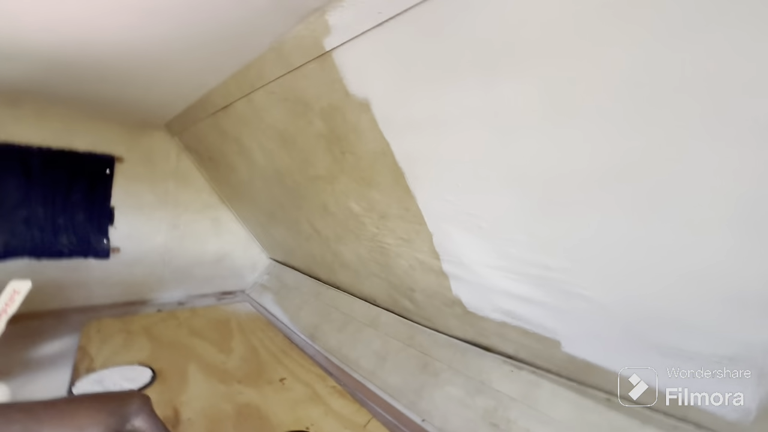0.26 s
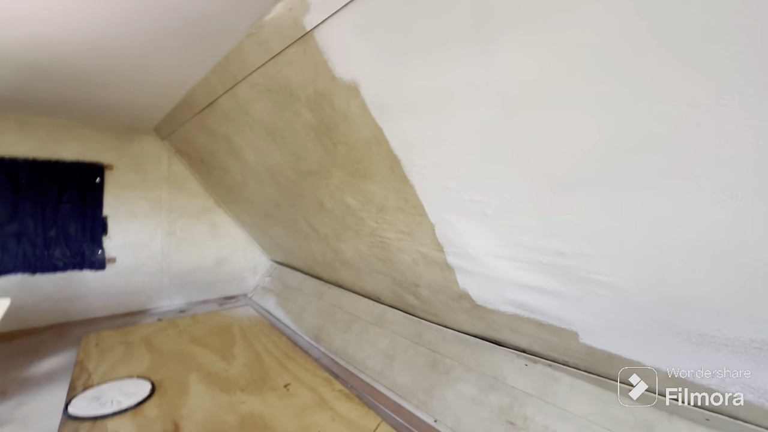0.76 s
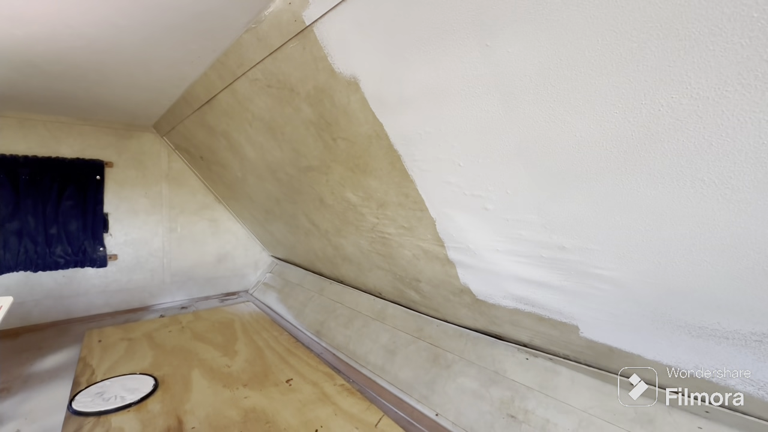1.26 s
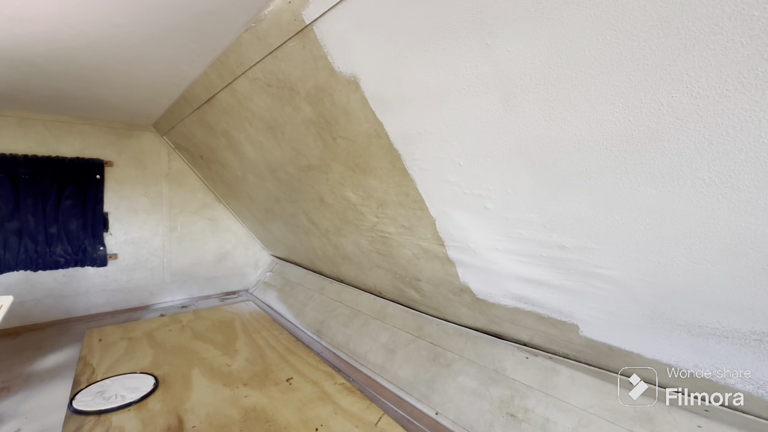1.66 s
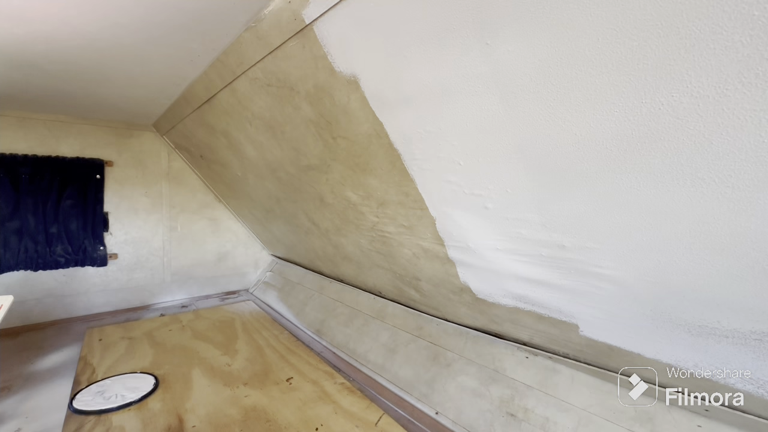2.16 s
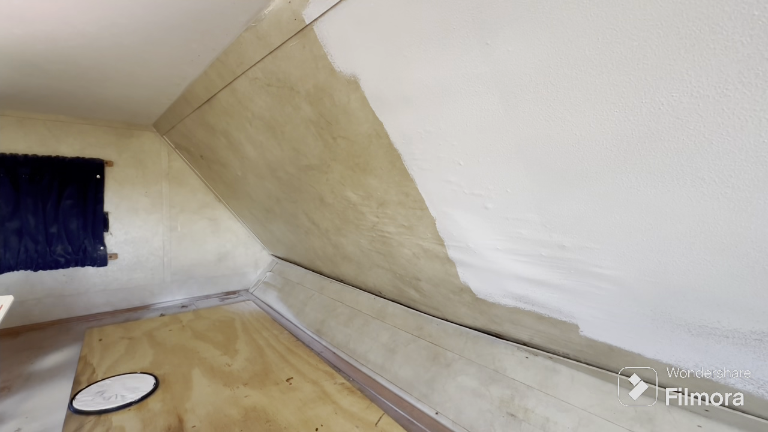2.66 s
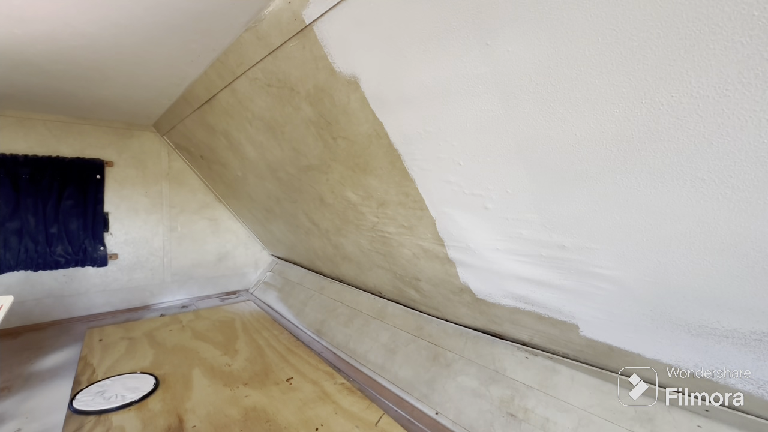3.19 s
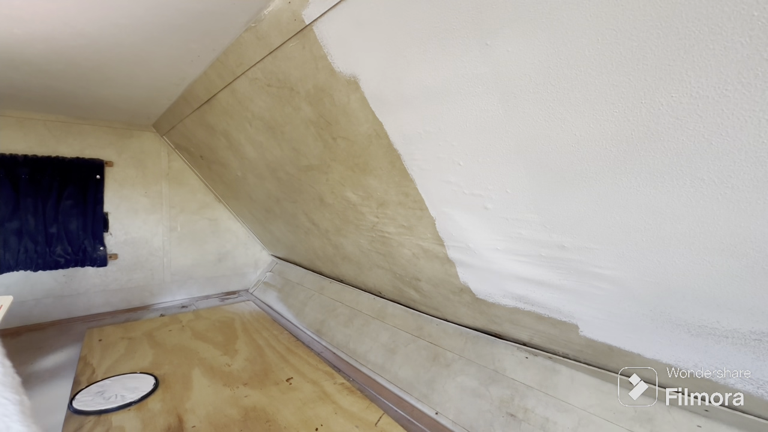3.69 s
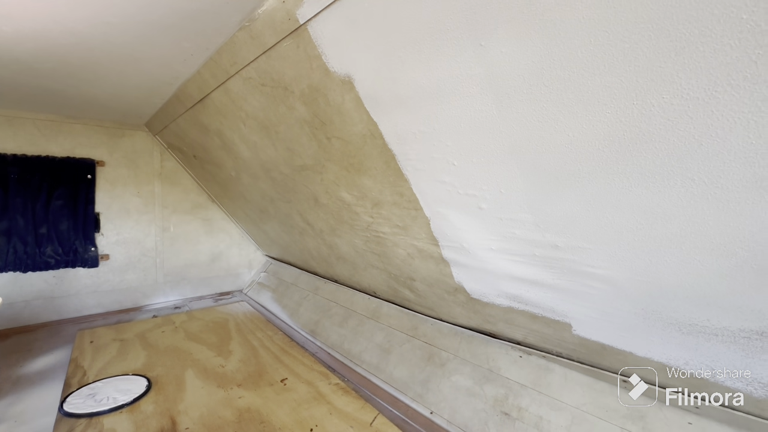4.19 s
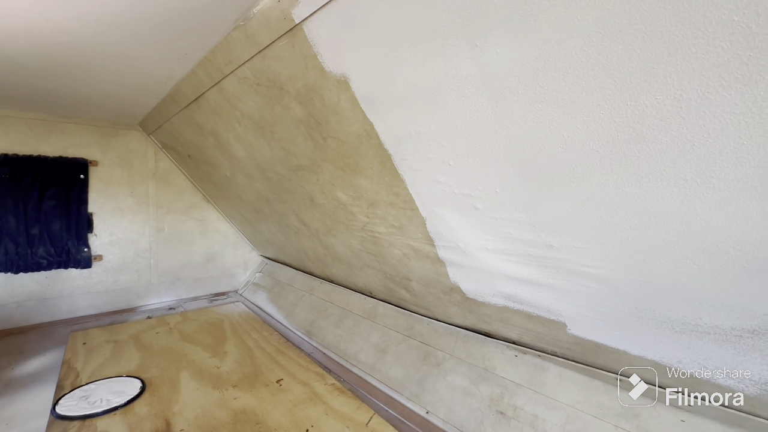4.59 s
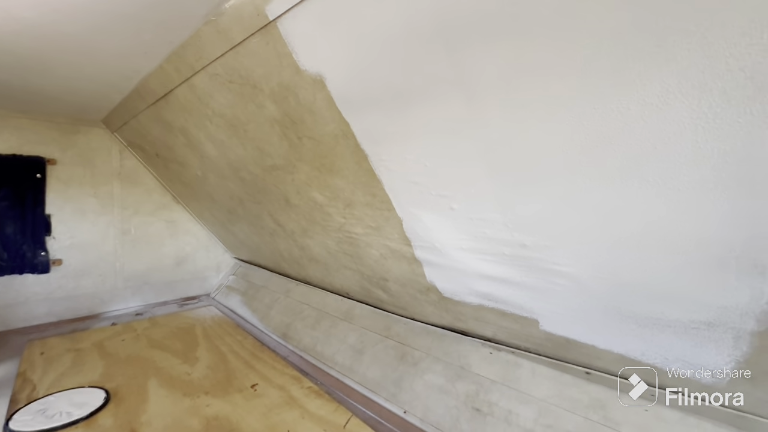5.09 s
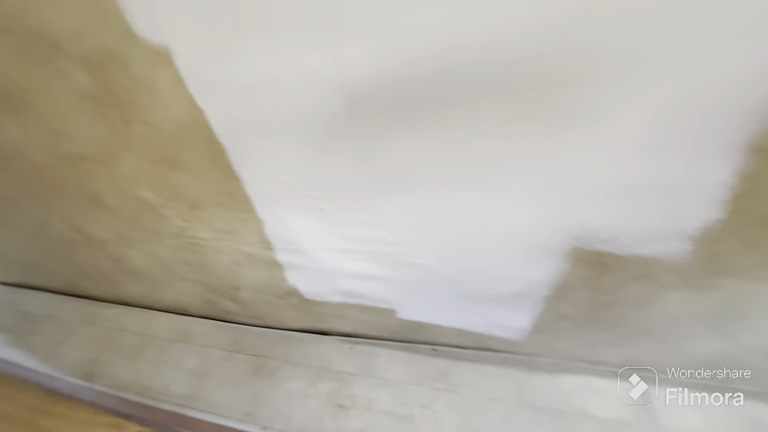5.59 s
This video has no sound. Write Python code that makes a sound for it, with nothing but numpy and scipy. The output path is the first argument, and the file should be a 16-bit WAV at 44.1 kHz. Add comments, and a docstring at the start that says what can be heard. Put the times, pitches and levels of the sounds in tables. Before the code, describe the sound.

A close, boxy stereo scene inside a bare vehicle cabin, with a faint low engine drone and soft rumble throughout. From 0.1 to 0.7 s there are small clicks, metallic frame ticks, a finger slip and dull board bumps amid light rubs. A faint tap at 1.2 to 1.35 s has a tiny squeak; a longer soft roller rub grows from about 1.5 s, with a knock near 1.75. From 2.05 to 3.1 s the wet roller is loudest: short, sticky, crackling pushes with fine hiss and a hollow panel murmur, plus a little axle chirp at 2.75. It fades, then at 3.45 to 3.65 s a brief squeaky scrape leads into hard knocks and a ringing rattle. Faint strokes follow from 3.8 to 5.1 s, with a soft bump near 5.07. A sleeve swishes around 5.2 to 5.55 s, then rapid clicks, crunching fingers and heavy thumps cluster until 5.85, strongest at 5.7.

```python
"""Inside a van, a wet paint roller works over bare panels while an engine hums outside.
Random snaps of paint make the crackle; slower tugs, through panel resonances, make the murmur below it.
The roller frame clicks, rings, squeaks and bumps the boards: shaped noise bursts and decaying modes.
Near the end a sleeve swishes as banded hiss. Fingers crunch on a phone case as jerky grains.
Shifting echoes place the work in the cabin; harmonics and soft noise make the engine and its rumble."""
import sys
import numpy as np
from scipy import signal
from scipy.fft import rfft, irfft, next_fast_len
from scipy.io import wavfile
from scipy.ndimage import uniform_filter1d

SR = 44100
rng = np.random.default_rng(int(sys.argv[2]) if len(sys.argv) > 2 else 0)


def transcribe(signal):
    """Save signal, clipped to [-1, 1], as a 16-bit WAV file at the path in sys.argv[1]."""
    frames = np.atleast_2d(signal).T
    limited = np.clip(frames, -1, 1)
    pcm = np.round(limited * 32767).astype(np.int16)
    wavfile.write(sys.argv[1], SR, pcm)


N = 257978
TIME = np.arange(N) / SR
PADDED = next_fast_len(N + SR // 8)
FREQ = np.maximum(np.fft.rfftfreq(PADDED, 1 / SR), 1)

# Source levels are relative, ahead of the mix; colours are relative, as each is brought to rms 1.
# Pushes of the roller: (start [s], length [s], paint crackle [dB], panel rub [dB],
# fine spray relative to crackle [dB], growth over the push [dB])
PUSHES = [(0.17, 0.1, -92, -66, -19, 10), (0.335, 0.092, -83, -59, -19, -7),
          (0.442, 0.18, -73.5, -61, -1.5, -1), (0.888, 0.075, -69.5, -81, -25, -3.5),
          (1.185, 0.2, -93, -64.5, -14, 10), (1.447, 0.054, -76.5, -55, -10, 2.5),
          (1.556, 0.5, -64.5, -56.5, -14, 4.5), (2.075, 0.098, -51, -51, -4, 2),
          (2.263, 0.097, -63.5, -57, -5.5, -4), (2.451, 0.23, -52, -51, -2, 4),
          (2.813, 0.13, -49, -50, -3, 0), (2.964, 0.097, -56, -58, 0.5, -1.5),
          (3.095, 0.4, -75.5, -71, -7, -15), (3.8, 0.43, -84, -93, -1, 8),
          (4.082, 0.14, -65, -68.5, -14.5, 2), (4.34, 0.3, -79, -67.5, -10, -4),
          (4.683, 0.19, -73, -64, -16, 4.5), (4.945, 0.21, -68, -63.5, -8, -4)]
# The nap tears off a tacky patch: (time [s], paint crackle [dB], panel rub [dB],
# fine spray relative to crackle [dB])
TACKY_PATCHES = [(1.864, -66, -49, -5), (2.22, -53, -44, 11.5), (2.307, -49, -53, -4.5),
                 (2.57, -47.5, -41.5, -5), (2.662, -44, -67, -2), (3.068, -48.5, -53, -19),
                 (5.024, -64, -56.5, -17)]
# Colour of the snapping paint: (frequency [Hz], level per Hz [dB])
CRACKLE_COLOUR = [(500, -57), (1200, 1), (2500, 0.5), (4300, -1), (5700, -1), (7000, -11.5), (9000, -7.5),
                  (14000, -42)]
# Colour of the fine spray: (frequency [Hz], level per Hz [dB])
SPRAY_COLOUR = [(4000, -30), (7000, -3), (9000, -3.5), (10500, -5), (12000, -7.5), (15500, -11)]
# Colour of the rubbed panel: (frequency [Hz], level per Hz [dB])
RUB_COLOUR = [(150, 2.5), (265, -3.5), (470, -2.5), (850, -1), (1300, -8), (2000, -7.5), (3000, -17.5),
              (6000, -32.5)]
# Resonances of the rubbed panel: (frequency [Hz], width [Hz], strength [dB])
PANEL_RESONANCES = [(796, 130, 7.5), (1223, 25, 12.5), (1492, 68, 9.5), (1670, 42, -2), (1900, 75, 1)]
# Colour of the frame scraping a board: (frequency [Hz], level per Hz [dB])
SCRAPE_COLOUR = [(240, -40), (430, -1.5), (584, -21), (723, -1), (900, -27), (1230, -4), (1450, -0.5),
                 (1750, -12), (2050, -9), (2500, -10.5), (3600, -20), (8690, -22.5), (15000, -39)]
# Modes of the roller frame: (frequency [Hz], level [dB], t60 [s])
FRAME_MODES = [(1155, 6, 0.042), (1227, -9.5, 0.67), (1323, -4.5, 0.06), (1453, -1, 0.12),
               (1654, -0.5, 0.049), (1840, -1.5, 0.042), (2180, -0.5, 0.06), (2476, 7.5, 0.051),
               (2780, -9, 0.04), (6040, -5, 0.14), (7950, -6, 0.16), (8870, 2.5, 0.054), (9160, -5, 0.053)]
# Blows that set the frame ringing: (time [s], peak [dB], centre of the ring [Hz])
FRAME_HITS = [(0.124, -40.5, 1210), (0.123, -47, 2600), (0.278, -47, 1240), (0.281, -39, 2750),
              (0.33, -47, 2750), (0.342, -44, 1370), (1.264, -53, 1550), (1.346, -37.5, 1790),
              (3.496, -34.5, 1500), (3.506, -41, 2200), (3.564, -30, 2520), (3.565, -34, 1700),
              (3.574, -46, 6850), (5.621, -37, 9500), (5.662, -38, 2300), (5.701, -26, 2010),
              (5.746, -33, 2300)]
# Squeaks of the axle: (time [s], length [s], level [dB], pitch [Hz],
# roughness [share of pitch], release [s])
AXLE_SQUEAKS = [(1.264, .004, -51.5, 9020, 0.052, 0.013), (1.267, .006, -60, 12750, .025, .007),
                (1.325, 0.012, -69, 4830, .006, 0.0065), (2.7396, 0.0024, -38.5, 3370, .025, 0.0016),
                (2.744, .011, -47.5, 2585, .025, .004), (2.757, 0.0041, -43.5, 3520, .015, .003),
                (2.757, .003, -43.5, 2030, 0.075, .004), (2.771, .004, -46, 3450, .03, .003)]
# Clicks and scuffs: (time [s], level at the centre [dB], centre of the contact [Hz],
# fall above it [dB per octave], t60 [s])
CONTACTS = [(0.123, -25.5, 1270, 27, 0.021), (0.122, -28, 2540, 62, 0.027),
            (0.258, -29.5, 2120, 10.5, 0.05), (0.278, -36, 8500, -2, 0.016), (0.279, -19.5, 930, 12, 0.062),
            (0.57, -42, 2000, 1.5, 0.049), (0.595, -21, 900, 9, 0.054), (0.67, -28.5, 600, 12, 0.098),
            (0.856, -43.5, 1500, 7.5, 0.042), (0.901, -42, 7160, 9, 0.043), (1.203, -37, 603, 21, 0.069),
            (1.263, -26.5, 1390, 25, 0.05), (1.262, -48, 4820, 22, 0.079), (1.346, -23, 1740, 25, 0.03),
            (1.359, -50, 12000, -24, 0.056), (1.721, -29.5, 800, 6, 0.065), (1.747, -22, 770, 14.5, 0.086),
            (2.071, -19, 765, 11.5, 0.06), (2.74, -32, 2430, 27, 0.034), (2.757, -37, 2800, 4, 0.035),
            (3.476, -33, 8500, 17, 0.043), (3.494, -11, 774, 18, 0.077), (3.562, -21.5, 950, 8, 0.095),
            (3.566, -19, 900, 11, 0.03), (3.565, -41, 13000, 0, 0.054), (3.664, -35.5, 1100, 11, 0.075),
            (3.808, -48, 600, 28, .08), (4.518, -45, 4630, 19, 0.092), (5.137, -32.5, 1200, 10, 0.076),
            (5.537, -28, 696, 9.5, 0.099), (5.564, -22, 750, 7, 0.05), (5.589, -19, 1250, 7, 0.034),
            (5.609, -29, 1800, 4, 0.02), (5.62, -21, 2200, 6.5, 0.031), (5.661, -21.5, 2250, 11.5, 0.032),
            (5.684, -21, 2290, 15, 0.034), (5.697, -20.5, 5000, 8, 0.016), (5.701, -14.5, 2000, 13.5, 0.03),
            (5.723, -27, 2600, 19, 0.025), (5.744, -21, 5500, 3, 0.015), (5.746, -22, 2200, 12, 0.025),
            (5.763, -20, 2000, 16, 0.035), (5.788, -26.5, 1000, 5, 0.037), (5.82, -29, 1900, 14, 0.071)]
# Modes of the boards: (nominal frequency [Hz], level [dB], free t60 [s])
BOARD_MODES = [(50.72, 5, 0.45), (63.4, 2.5, 0.039), (85.5, 11.5, 0.25), (97.6, 10.5, 0.094),
               (143.6, 8.5, 0.31), (163, -11.5, 0.3), (210.4, 4, 0.18), (251, -3.5, 0.19),
               (288.2, -9.5, 0.41), (339.4, 1.5, 0.097), (385, -8.5, 0.052), (426, -9.5, 0.3),
               (516, -5.5, 0.14), (585, -5, 0.18), (733, -0.5, 0.11), (816, -4, 0.042), (995, -14, 0.089),
               (1307, 1.5, 0.055), (1440, 0.5, 0.24), (1578, -11, 0.16), (2000, 5, 0.085)]
# Blows on the boards: (time [s], knock peak [dB], knock centre [Hz], knock ring [share of free t60],
# low thud peak [dB], thud ring [share of free t60])
BOARD_BLOWS = [(0.254, -38, 128, .5, -13.5, 0.43), (0.279, -36.5, 395, 0.68, -50, 0.5),
               (0.309, -27.5, 212, 0.84, -27, 0.65), (0.398, -60, 120, .5, -26.5, 0.5),
               (0.59, -20, 185, 0.81, -22, 0.71), (0.685, -37, 200, 0.42, -21.5, 0.55),
               (1.749, -35.5, 265, 0.83, -30, 3.1), (2.072, -31.5, 275, 0.96, -27.5, 3.3),
               (2.565, -39.5, 270, 0.64, -38, 0.65), (2.7, -60, 130, 0.51, -29.5, 2.3),
               (3.495, -27, 760, 0.51, -50, .5), (3.5, -23, 275, 0.43, -31, 0.61),
               (3.514, -30, 390, 0.5, -52, 0.42), (3.534, -37.5, 580, 0.47, -52, 0.35),
               (3.56, -36, 232, 0.97, -23.5, 0.48), (3.655, -63, 200, .5, -30, 0.75),
               (4.793, -51, 553, 1, -56, 0.55), (5.07, -30, 224, 0.33, -24.5, 0.51),
               (5.395, -46, 131, 0.83, -26.5, 0.36), (5.532, -29.5, 113, 0.35, -23, 0.4),
               (5.579, -28.5, 173, 0.56, -19.5, 0.11), (5.619, -47, 200, 0.77, -17.5, 0.62),
               (5.66, -31, 320, 0.7, -19, 0.49), (5.698, -16.5, 190, 0.78, -9.5, 0.38),
               (5.743, -23.5, 245, 0.65, -12.5, 0.3), (5.762, -21, 181, 0.46, -29, 0.22),
               (5.798, -44, 198, 0.44, -15.5, 0.24)]
# Colour of the sliding cloth: (frequency [Hz], level per Hz [dB])
CLOTH_COLOUR = [(300, 2.5), (650, -6.5), (1000, -10), (2500, -10.5), (4200, -2.5), (6000, -9), (9000, -9),
                (12000, -20), (15000, -23)]
# Fingers slip on the phone: (start [s], length [s], level [dB], growth over the slip [dB])
SLIPS = [(0.273, 0.019, -44, -3), (0.305, 0.039, -58, -5), (5.575, 0.0086, -42, 5),
         (5.614, 0.021, -40.5, 2), (5.649, 0.021, -44.5, 10), (5.709, 0.021, -42.5, -8),
         (5.746, 0.02, -37, 0.5), (5.787, 0.036, -48, -5)]
# Colour of skin on the phone case: (frequency [Hz], level per Hz [dB])
SKIN_COLOUR = [(150, -23), (320, 3), (480, -4), (640, -2), (790, 7), (1100, -6.5), (1400, 3.5), (1600, -21),
               (2000, 4.5), (2700, 1), (3300, -4), (4500, -8.5), (7000, -13), (9000, -8.5), (12000, -28),
               (15000, -29)]
# Engine harmonics: (multiple of the shaft rate, level [dB])
ENGINE_HARMONICS = [(2, -44), (3, -54.5), (4, -51.5), (5, -49), (6, -56.5), (7, -71), (8, -65), (10, -66.5)]
# Colour of the background rumble and hiss: (frequency [Hz], level per Hz [dB])
AIR_COLOUR = [(15, -26), (28, -1.5), (44, 0.5), (60, 0.5), (75, -1), (135, -6), (190, -18), (290, -15.5),
              (440, -28.5), (700, -35.5), (1600, -48), (3500, -52.5), (5000, -59), (9000, -60.5),
              (15000, -85)]
# Faint bands added to the background hiss: (frequency [Hz], width [Hz], strength [dB])
AIR_BANDS = [(1630, 110, 0), (2210, 240, 1), (3460, 290, 3.5)]
# Balance of the microphone ports: (frequency [Hz], left minus right [dB])
STEREO_BALANCE = [(60, -0.5), (150, 0), (300, -0.5), (700, 4), (1300, 2), (2400, 3.5), (3600, 5),
                  (4800, 7.5), (7000, 3), (7900, 2.5), (9200, -11), (10000, -6.5), (11000, -1),
                  (15000, 0.5)]
# Gain of the difference between the ports: (frequency [Hz], gain [dB])
SIDE_GAIN = [(50, -13), (150, 9), (400, 6.5), (10500, 5.5), (12000, -21), (15000, 8)]
# Notches of the ports: (frequency [Hz], width [Hz], gain at the centre [dB])
NOTCHES = [(5200, 70, -9), (7500, 140, -11), (9500, 100, -5)]

STROKE_ATTACK_S, STROKE_RELEASE_S = 0.029, 0.031
PATCH_S, PATCH_EDGE_S = 0.0099, 0.013  # time on a tacky patch; its rise and fall
DRAG_START_S, DRAG_LENGTH_S, SCRAPE_DB, SQUEAK_DB = 3.438, 0.036, -42.5, -44
SQUEAK_HZ, SQUEAK_SAG_HZ_PER_S = 746, 460
CONTACT_TOP_HZ, CONTACT_TOP_FALL_DB = 9800, 22  # further fall per octave above this pitch
THUD_HZ, THUD_LAG_S = 54.7, 0.008  # the wall heaves just after each blow
SLEEVE_START_S, SLEEVE_FASTEST_S, SLEEVE_END_S = 5.165, 5.38, 5.545
SLEEVE_DB, SLEEVE_SPEED_DB = -57.5, 6.5  # level when slow; gain at full speed
WEAVE_HZ, WEAVE_RISE_HZ_PER_S, WEAVE_DB, WEAVE_LENGTH_S = 3740, 1800, -58, 0.23
ENGINE_HZ = 26.29
TOP_HZ = 15750


def roller(crackle_db=1, spray_db=0, rub_db=1.0, nap_db=0.85, firm_db=-53.0):
    """Paint threads snap behind the nap; tugs shake the panel, which rings under firm pressure."""
    crackle, rub, spray = pressure()
    tufts = undb(nap_db * walk(80))  # tufts of the nap let go unevenly
    snaps = wander(grains(4200, 2.8) * tufts, depth_db=1.8, rate=55)
    tugs = grains(1800, 3) * tufts
    contact = wander(tugs, depth_db=2.0, rate=30)

    peaks = sum(undb(db) * resonance(hz, width) for hz, width, db in PANEL_RESONANCES)
    firm = rub ** 2 / (rub ** 2 + undb(2 * firm_db))  # 0 for a light rub, near 1 for a firm one
    dull = colour(contact, shape(RUB_COLOUR))
    ringing = colour(contact, shape(RUB_COLOUR) * (1 + 2 * peaks))
    murmur = (1 - firm) * dull + firm * ringing

    threads = undb(crackle_db) * crackle * colour(snaps, shape(CRACKLE_COLOUR))
    mist = undb(spray_db) * spray * colour(snaps, shape(SPRAY_COLOUR))
    return threads + mist + undb(rub_db) * rub * murmur


def pressure():
    """Strength of crackle, rub and spray: the energies of all pushes and tacky patches add up."""
    moves = []
    for s, length, wet, press, fine, growth in PUSHES:
        gain = gesture(s, length, growth, STROKE_ATTACK_S, STROKE_RELEASE_S)
        moves.append((gain, wet, press, fine))
    for s, wet, press, fine in TACKY_PATCHES:
        moves.append((gesture(s, PATCH_S, 0, PATCH_EDGE_S, PATCH_EDGE_S), wet, press, fine))
    return np.sqrt(sum(np.outer(undb([wet, press, wet + fine]), gain) ** 2
                       for gain, wet, press, fine in moves))


def drag(wobble=0.02534, octave_db=0, chatter_db=1.0, attack_s=0.0014, release_s=0.024,
         growth_db=2, squeak_share=0.49):
    """The frame scrapes along a board and at first sticks and slips, at a pitch that sags."""
    hz = SQUEAK_HZ - SQUEAK_SAG_HZ_PER_S * np.clip(TIME - DRAG_START_S, 0, DRAG_LENGTH_S)
    phase = 2 * np.pi * np.cumsum(hz * (1 + wobble * walk(200))) / SR
    tone = np.sin(phase) + undb(octave_db) * np.sin(2 * phase)
    squeak = unit(tone * undb(chatter_db * walk(350)))
    scrape = colour(grains(3500, 1.4), shape(SCRAPE_COLOUR))
    sliding = gesture(DRAG_START_S, DRAG_LENGTH_S, growth_db, attack_s, release_s)
    sticking = gesture(DRAG_START_S, DRAG_LENGTH_S * squeak_share, growth_db, attack_s, release_s)
    return undb(SCRAPE_DB) * sliding * scrape + undb(SQUEAK_DB) * sticking * squeak


def frame(octaves=0.14, blur_rad=1.1, flutter_db=5.5, rise_s=0.00038):
    """Each blow rings the frame modes near its centre; the loose fit blurs and flutters the ring."""
    out, t = np.zeros(N), TIME[:SR // 2]
    hz, db, t60 = np.transpose(FRAME_MODES)[:, :, None]
    sign = (-1) ** np.arange(len(hz))[:, None]
    blur = np.array([walk(170, size=len(t)) for _ in FRAME_MODES])
    flutter = np.array([walk(140, size=len(t)) for _ in FRAME_MODES])
    tones = np.sin(2 * np.pi * hz * t + blur_rad * blur)
    modes = sign * undb(db + flutter_db * flutter) * tones * np.exp(-np.log(1000) * t / t60)
    for s, peak_db, centre_hz in FRAME_HITS:
        ring = np.sum(near(hz, centre_hz, octaves) * modes, axis=0) * (1 - np.exp(-t / rise_s))
        add(out, s, undb(peak_db) * ring / np.abs(ring).max())
    return out


def chirps(rise_s=0.0011, chatter_db=1.0, jitter_rate=1300, chatter_rate=500):
    """The axle sticks and slips for a few milliseconds, at an unsteady pitch."""
    out, t = np.zeros(N), TIME[:SR // 5]
    for s, length, db, hz, rough, release in AXLE_SQUEAKS:
        pitch = hz * (1 + rough * walk(jitter_rate, size=len(t)))
        phase = 2 * np.pi * np.cumsum(pitch) / SR
        envelope = (1 - np.exp(-t / rise_s)) * np.exp(-np.maximum(t - length, 0) / release)
        level = undb(db + chatter_db * walk(chatter_rate, size=len(t)))
        add(out, s, level * envelope * np.sin(phase))
    return out


def clicks(click_db=2, rise_s=0.0014, bass_fall_db=7):
    """A short noise crack, strongest at the centre of the contact and falling away on both sides."""
    out, t = np.zeros(N), TIME[:SR // 3]
    freq = np.maximum(np.fft.rfftfreq(len(t), 1 / SR), 1)
    top_db = -CONTACT_TOP_FALL_DB * np.maximum(np.log2(freq / CONTACT_TOP_HZ), 0)
    for s, level_db, centre_hz, fall_db, t60 in CONTACTS:
        noise = rng.standard_normal(len(t))
        above = np.log2(freq / centre_hz)  # octaves above the centre
        slopes_db = bass_fall_db * np.minimum(above, 0) - fall_db * np.maximum(above, 0)
        gain = undb(level_db + slopes_db + top_db)
        envelope = np.exp(-np.log(1000) * t / t60) * (1 - np.exp(-t / rise_s))
        add(out, s, undb(click_db) * irfft(rfft(noise) * gain, len(t)) * envelope)
    return out


def bumps(octaves=0.4):
    """Each blow rings the board modes near its own centre, then the lowest ones as the wall heaves."""
    out, t = np.zeros(N), TIME[:SR // 2]
    hz, db, t60 = np.transpose(BOARD_MODES)[:, :, None]
    sign = (-1) ** np.arange(len(hz))[:, None]
    for s, knock_db, knock_hz, knock_ring, thud_db, thud_ring in BOARD_BLOWS:
        detuned = hz * (1 + 0.01 * rng.standard_normal((len(hz), 1)))
        modes = sign * undb(db) * np.sin(2 * np.pi * detuned * t)
        knock = (0, knock_db, knock_hz, knock_ring)
        thud = (THUD_LAG_S, thud_db, THUD_HZ, thud_ring)
        for lag_s, peak_db, centre_hz, length in (knock, thud):
            decay = np.exp(-np.log(1000) * t / (t60 * length))
            ring = np.sum(near(hz, centre_hz, octaves) * modes * decay, axis=0)
            add(out, s + lag_s, undb(peak_db) * ring / np.abs(ring).max())
    return out


def sleeve(width_hz=200, attack_s=0.029, release_s=0.085):
    """Cloth hisses louder with speed, while its weave whistles in a narrow, rising band at first."""
    speed = np.interp(TIME, [SLEEVE_START_S, SLEEVE_FASTEST_S, SLEEVE_END_S], [0, 1, 0])
    swish = gesture(SLEEVE_START_S, SLEEVE_END_S - SLEEVE_START_S, 0, attack_s, release_s)
    hiss = colour(grains(12000, 0.86), shape(CLOTH_COLOUR))

    hz = WEAVE_HZ + WEAVE_RISE_HZ_PER_S * np.clip(TIME - SLEEVE_START_S, 0, WEAVE_LENGTH_S)
    phase = 2 * np.pi * np.cumsum(hz) / SR
    slow_noise = colour(rng.standard_normal(N), 1 / (1 + (FREQ / width_hz) ** 2))
    weave = unit(slow_noise * np.sin(phase))
    whistle = gesture(SLEEVE_START_S, WEAVE_LENGTH_S, 0, attack_s, release_s)
    return undb(SLEEVE_DB + SLEEVE_SPEED_DB * speed) * swish * hiss + undb(WEAVE_DB) * weave * whistle


def fingers(jerk_db=2.5, attack_s=0.0065, release_s=0.019):
    """Skin slips over the phone case in small, crunching jerks."""
    grip = np.sqrt(sum((undb(db) * gesture(s, length, growth, attack_s, release_s)) ** 2
                       for s, length, db, growth in SLIPS))
    jerks = grains(1300, 2.5) * undb(jerk_db * walk(220))
    return grip * colour(wander(jerks, depth_db=2.5, rate=110), shape(SKIN_COLOUR))


def background(hum_db=0, waver_db=-1.0, air_db=-46, side_db=-7):
    """A distant engine drones in wavering harmonics of its shaft rate, over a soft, wide rumble."""
    turns = np.cumsum(ENGINE_HZ * (1 + 0.00585 * walk(4.014))) / SR
    hum = np.zeros(N)
    for k, db in ENGINE_HARMONICS:
        level = undb(db + waver_db * walk(18)) * np.sqrt(2)  # table levels are rms
        hum += level * np.sin(2 * np.pi * (k * turns + rng.random()))
    bands = 1 + sum(undb(db) * np.abs(resonance(hz, width)) ** 2 for hz, width, db in AIR_BANDS)
    mid, side = (colour(rng.standard_normal(N), shape(AIR_COLOUR) * bands) for _ in range(2))
    air = mid + undb(side_db) * side * np.array([[1], [-1]])
    return undb(hum_db) * hum + undb(air_db) * air


def cabin(x, wet_db, side_db, t60_s, shift_rate, low_hz=160, count=4):
    """Bare panels return dense echoes, shared by both ports or opposed, in a shifting pattern."""
    t = TIME[:SR // 3]
    decay = np.exp(-np.log(1000) * t / t60_s)
    spectrum = rfft(rng.standard_normal((count, 2, len(t))) * decay)
    # even out the spectrum, then fade the tail
    echoes = irfft(spectrum / np.abs(spectrum), len(t)) * np.minimum(10 * decay, 1)
    echoes = signal.sosfilt(signal.butter(2, low_hz, "high", fs=SR, output="sos"), echoes)
    blend = np.array([walk(shift_rate) for _ in echoes])
    blend /= np.linalg.norm(blend, axis=0)  # constant power as the patterns trade places
    shared, opposed = sum(share * signal.fftconvolve(x[None], pattern, axes=1)[:, :N]
                          for share, pattern in zip(blend, echoes))
    return x + undb(wet_db) * shared + undb(side_db) * opposed * np.array([[1], [-1]])


def gesture(start_s, length_s, growth_db, attack_s, release_s):
    """Gain of one movement: exponential attack before the start, even growth or fade, release."""
    early = np.maximum(start_s - TIME, 0) / attack_s
    late = np.maximum(TIME - start_s - length_s, 0) / release_s
    progress = np.clip((TIME - start_s) / length_s, 0, 1)
    return undb(growth_db * (progress - 0.5)) * np.exp(-np.minimum(early + late, 20))


def wander(x, depth_db, rate, count=16):
    """As the contact moves over a surface, neighbouring bands swell and fade on their own."""
    centres, spectrum = np.log(np.geomspace(300, 12000, count)), rfft(x, PADDED)
    total = np.zeros(N)
    for band in np.eye(count):
        gain = np.interp(np.log(FREQ), centres, band)
        total += irfft(spectrum * gain, PADDED)[:N] * undb(depth_db * walk(rate))
    return unit(total)


def grains(rate, spread_db):
    """Random tiny snaps, about rate a second, a few much larger than the rest; rms 1."""
    size = undb(spread_db * np.minimum(rng.exponential(size=N), 5))
    return unit((rng.random(N) < rate / SR) * size * rng.choice([-1, 1], N))


def walk(rate, size=N):
    """Smooth chance with about rate turns a second; spread near 1."""
    k = max(int(SR / rate), 2)
    steps = np.repeat(rng.standard_normal(size // k + 1), k)
    return 1.315 * uniform_filter1d(uniform_filter1d(steps, k), k)[:size]


def near(hz, centre_hz, octaves):
    """How strongly a contact centred on one frequency excites a mode at another."""
    return (1 + (np.log2(hz / centre_hz) / octaves) ** 4) ** -0.5


def resonance(hz, width_hz):
    """Response of one resonance, gain 1 at its centre."""
    return 1 / (1 + 1j * (FREQ ** 2 - hz ** 2) / (FREQ * width_hz))


def shape(points):
    """Gain at every frequency, drawn through (frequency [Hz], level [dB]) points."""
    hz, db = np.transpose(points)
    return undb(np.interp(np.log(FREQ), np.log(hz), db))


def colour(x, gain):
    """Filter by a frequency response; rms 1."""
    return unit(irfft(rfft(x, PADDED) * gain, PADDED)[:N])


def unit(x):
    """Scale to rms 1."""
    return x / np.sqrt(np.mean(x ** 2) + 1e-20)


def undb(db):
    """Decibels to gain."""
    return 10 ** (np.asarray(db) / 20)


def add(out, s, sound):
    """Mix a sound in at time s."""
    start = int(s * SR)
    out[start:start + len(sound)] += sound[:N - start]


def scene():
    """Roller work, taps and thuds each get their own cabin echoes, over the dry background."""
    work = cabin(roller() + drag() + sleeve(), wet_db=-4.0, side_db=-3.5, t60_s=0.11, shift_rate=8)
    small_hits = clicks() + frame() + chirps() + fingers()
    taps = cabin(small_hits, wet_db=-6.5, side_db=-4.5, t60_s=0.1, shift_rate=6)
    thuds = cabin(bumps(), wet_db=-4, side_db=-8.5, t60_s=0.086, shift_rate=4)
    return undb(-3.0) * work + undb(-5.5) * taps + thuds + background()


def record(dry):
    """Two microphone ports colour each side differently and notch the treble; sub-bass and top are cut."""
    left, right = rfft(dry, PADDED)
    mid, side = (left + right) / 2, (left - right) / 2 * shape(SIDE_GAIN)
    lean = np.sqrt(shape(STEREO_BALANCE))  # half the balance to each side
    notches = undb(sum(db / (1 + ((FREQ - hz) / width) ** 2) for hz, width, db in NOTCHES))
    ports = np.array([(mid + side) * lean, (mid - side) / lean])
    heard = irfft(ports * notches, PADDED)[:, :N]
    heard = signal.sosfilt(signal.butter(4, 33, "high", fs=SR, output="sos"), heard)
    return signal.sosfilt(signal.ellip(12, 0.2, 80, TOP_HZ, fs=SR, output="sos"), heard)


dry = scene()
out = record(dry)
transcribe(out)
```